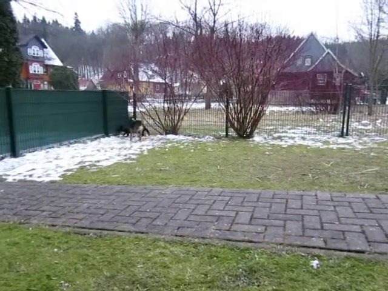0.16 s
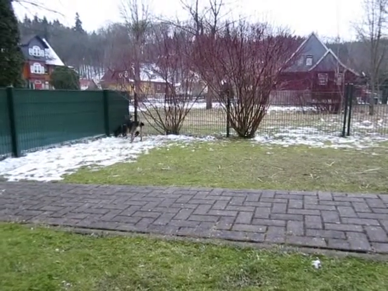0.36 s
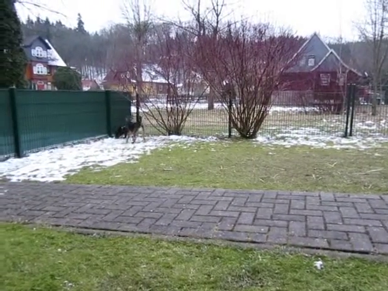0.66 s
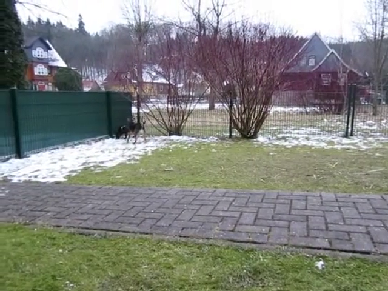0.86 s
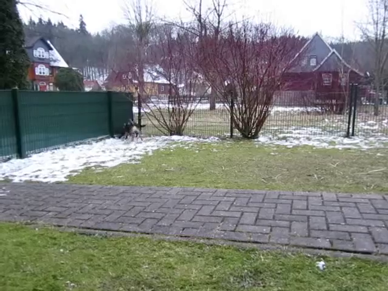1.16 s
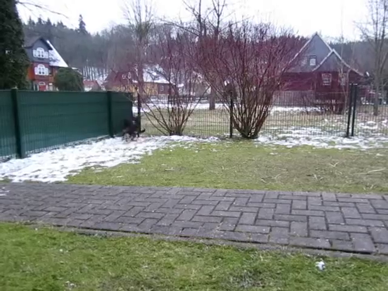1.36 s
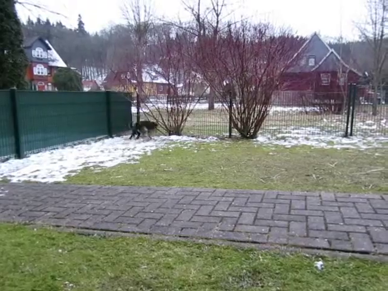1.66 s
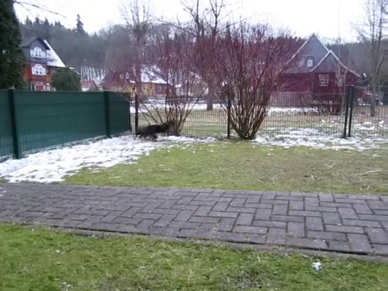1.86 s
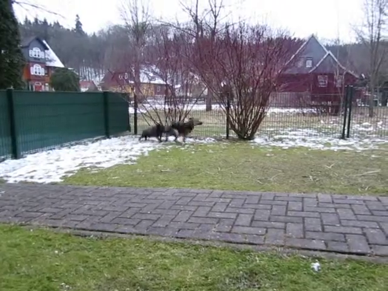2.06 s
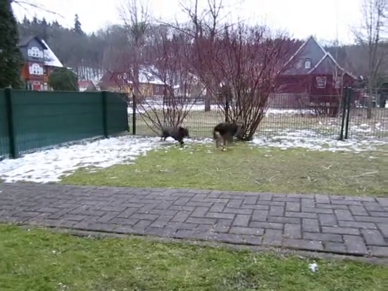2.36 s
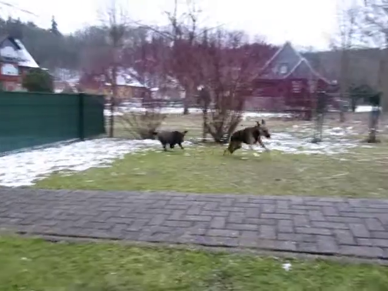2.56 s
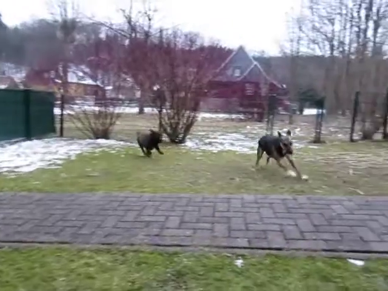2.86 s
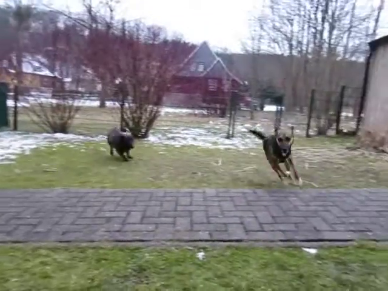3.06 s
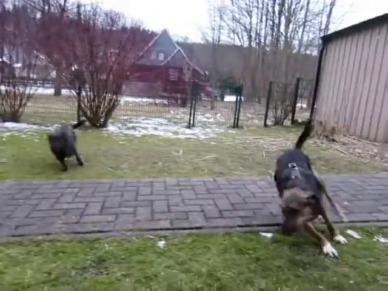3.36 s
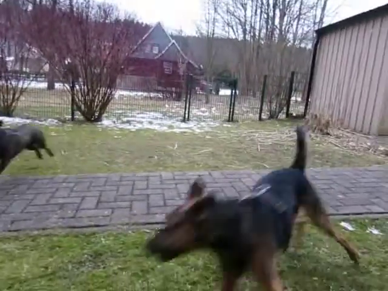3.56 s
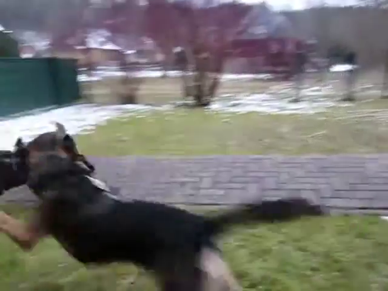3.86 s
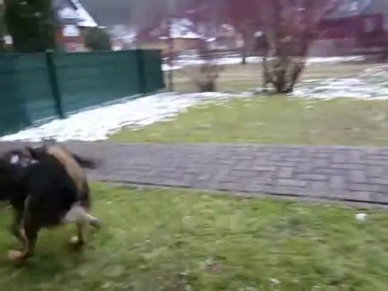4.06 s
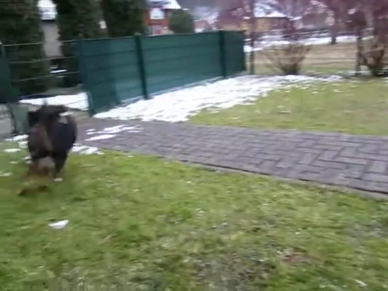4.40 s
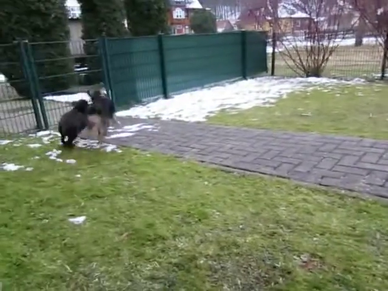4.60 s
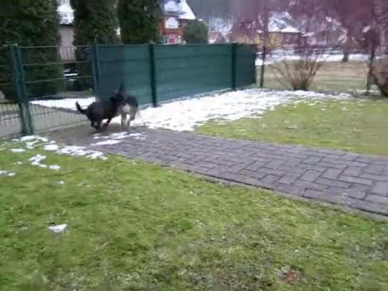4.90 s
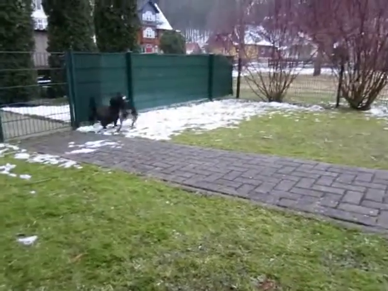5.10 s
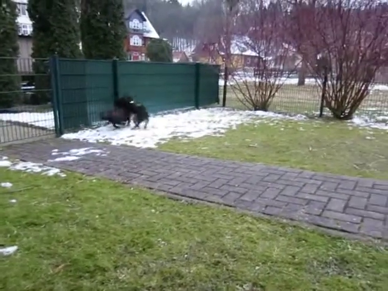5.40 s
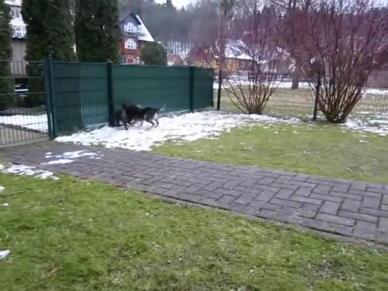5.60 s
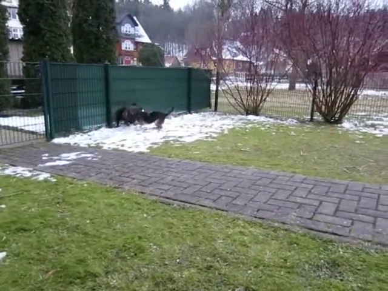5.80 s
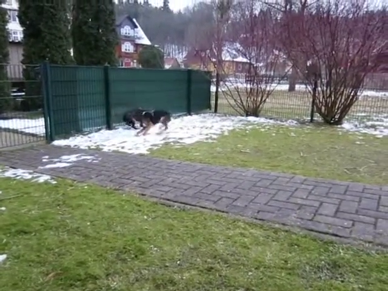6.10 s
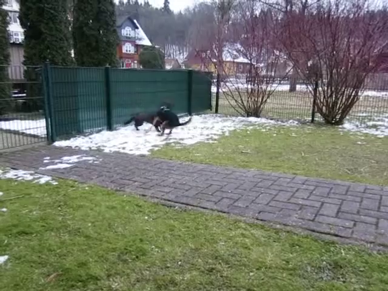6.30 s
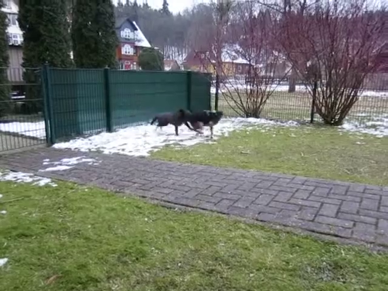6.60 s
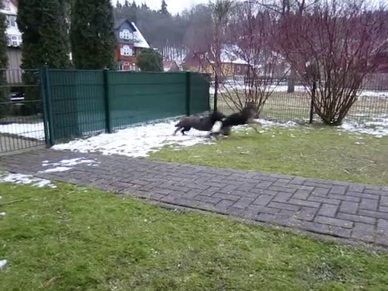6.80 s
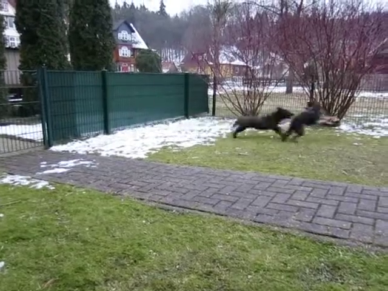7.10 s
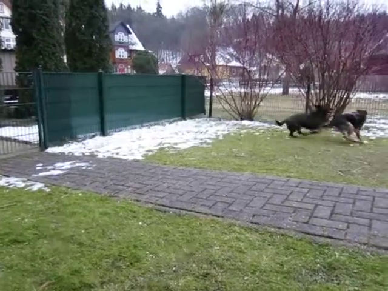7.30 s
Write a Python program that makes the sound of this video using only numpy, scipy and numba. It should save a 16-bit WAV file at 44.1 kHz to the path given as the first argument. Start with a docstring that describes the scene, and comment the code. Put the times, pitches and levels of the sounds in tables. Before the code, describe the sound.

A soft, low outdoor hush runs throughout, with thin bird chirps now and then, most clustered around 2.3-2.5 seconds. At 0.3 a collar tag ticks twice over light rustling and soft paw thuds. From 1.3 to 2.0 a dog growls, throaty and wavering, partly clear in tone. Around 2 the tag jingles and paws break into a run, crunching grass and snow; claws scrape grittily at 2.8, 3.1 and 3.5. A very loud, dry knock hits the microphone at 3.4. Close crunching, skidding and a bright tag jingle pass at 3.7-4.0. A short bark comes at 4.1, a rasping snarl at 4.4-4.7, with sharp snaps and crackling. A rough, pulsing wrestling growl fills 5.1-6.0, ending with a faint thin whistle. Short gruff barks follow at 6.2, 6.6, 7.0 and 7.3, amid rustling and slight garden echo.

```python
"""Dogs play-fight in a winter garden: rough pulses of voice ring chest, throat, mouth and teeth as growls and barks.
A metal collar tag jingles as a set of struck tones; paws thud as damped bursts of noise.
Grass and snow crackle as many tiny random fractures, claws scrape grittily, and the camera is knocked once.
Small birds chirp as bending whistles over a distant hush of filtered noise; a fence, shed and bushes echo."""
import sys
import numpy as np
from scipy import signal
from scipy.fft import rfft, irfft, next_fast_len
from scipy.io import wavfile
from scipy.ndimage import uniform_filter1d
from numba import njit

SR = 44100
rng = np.random.default_rng(int(sys.argv[2]) if len(sys.argv) > 2 else 0)


def wrap_up_sound(samples):
    """Save the sound to the file named by the first command line argument, as 16-bit audio."""
    columns = np.atleast_2d(samples).T
    # keep every value between -1 and 1, then stretch to whole-number steps
    tamed = np.clip(columns, -1, 1)
    steps = np.round(tamed * 32767).astype(np.int16)
    wavfile.write(sys.argv[1], SR, steps)


N = 328525
T = np.arange(N) / SR  # time of every sample in seconds

# How much grass and snow rustle under the dogs. Each row: time in seconds, relative level in dB.
SCUFFLE = [(.35, -57.5), (.7, -88), (1.3, -64.5), (1.95, -54.5), (3.6, -55.5), (4.8, -50.5), (5.3, -51),
           (6.1, -56.5), (6.85, -49), (7.2, -64)]


def undb(db):
    """Turn decibels into a gain."""
    return 10 ** (np.asarray(db) / 20)


def unit(x):
    """Scale to an average (rms) strength of 1."""
    return x / np.sqrt(np.mean(x ** 2) + 1e-18)


def steady(x, size=1300):
    """Even out the short-time strength to about 1 while keeping the single pulses."""
    power = uniform_filter1d(uniform_filter1d(x ** 2, size), size // 2)
    return x / np.sqrt(power + 1e-14)


def add(track, s, x):
    """Mix x into the track from time s in seconds."""
    i = int(np.clip(s * SR, 0, N - 1))
    track[i:i + len(x)] += x[:N - i]


def wander(count, hz):
    """Random values joined by straight lines, with hz new values a second."""
    return np.interp(np.arange(count) * hz / SR, np.arange(1024), rng.standard_normal(1024))


def follow(t, rows):
    """Read every column of a curve at the times t; the first column is time."""
    s, *columns = np.transpose(rows)
    return [np.interp(t, s, column) for column in columns]


def spectral(x, response):
    """Filter by a response given as a function of frequency."""
    n = next_fast_len(x.shape[-1] + 2048)
    hz = np.arange(n // 2 + 1) * SR / n + 1e-3
    return irfft(rfft(x, n) * response(hz), n)[..., :x.shape[-1]]


def colour(x, points):
    """Filter along a curve of points, each a frequency in Hz and a gain in dB."""
    hz, db = np.transpose(points)
    return spectral(x, lambda f: undb(np.interp(np.log(f), np.log(hz), db)))


@njit
def svf(x, hz, width):
    """Band-pass whose centre may move at every sample, like a changing hollow space."""
    y, b, l = np.empty(len(x)), 0., 0.  # output, band-pass state, low-pass state
    for i in range(len(x)):
        g, k = np.tan(np.pi * hz[i] / SR), width / hz[i]
        v = (b + g * (x[i] - l)) / (1 + g * (g + k))
        b, l, y[i] = 2 * v - b, l + 2 * g * v, k * v
    return y


def resonate(x, hz, width_hz):
    """A steep resonance: the band-pass applied twice."""
    centre = hz + np.zeros(len(x))
    once = svf(x, centre, float(width_hz))
    return svf(once, centre, float(width_hz))


def cavity(x, modes):
    """A hollow body: side-by-side resonances, added with alternating sign."""
    out = 0
    for k, (hz, width, db) in enumerate(modes):
        out = out + (-1) ** k * undb(db) * resonate(x, hz, width)
    return out


def ring(modes, length=.2):
    """A struck solid: each mode is a tone that falls by 60 dB in its time t60."""
    t = T[:int(length * SR)]
    return sum(undb(db - 60 * t / t60) * np.sin(2 * np.pi * hz * t) for hz, db, t60 in modes)


def ports(x):
    """Two microphone openings hear the treble out of step: equal strength, shifted phase."""
    # Each row: frequency in Hz, angle in radians by which the left leads the right.
    lead_points = [(120, 0), (400, .2), (900, .58), (2500, -.13), (8000, 1.46), (10000, 1.28), (13400, 3.4)]
    half_lead = lambda f: np.interp(f, *np.transpose(lead_points)) / 2
    return np.array([spectral(x, lambda f: np.exp(1j * side * half_lead(f))) for side in (1, -1)])


def stereo(mid, side, wide_hz=55):
    """Sound from all around: long waves reach both sides alike, short ones differ."""
    return mid + spectral(side, lambda f: 0.74 * f / (f + wide_hz)) * np.array([[1], [-1]])


def garden(x, wet_db, t60):
    """Direct sound plus scattered echoes from fence, shed and bushes, fading by 60 dB in t60 seconds."""
    t = T[:SR // 2]
    fade = undb(-60 * t / t60) * (1 - np.exp(-t / 0.00041))
    tail = stereo(*rng.standard_normal((2, len(t)))) * fade
    tail /= np.sqrt(np.sum(tail ** 2, axis=1, keepdims=True))
    echoes = signal.fftconvolve(x[None], tail, axes=1)[:, :N]
    return ports(x) + undb(wet_db) * echoes


def strays(count, db):
    """Faint events at random moments, louder where the dogs rustle more: rows of seconds and dB."""
    spread_db = 5
    chance = rng.random((count, 2))
    s = (np.arange(count) + chance[:, 0]) / count * T[-1]
    levels_db = np.interp(s, *np.transpose(SCUFFLE)) + db - spread_db * chance[:, 1]
    return list(zip(s, levels_db))


def hush(level_db=-42.5, waver_db=0.76):
    """Distant outdoor air: deep-coloured noise, gently wavering, with the bass alike on both sides."""
    # Tone colour of the air. Each row: frequency in Hz, relative level in dB.
    air_colour = [(15, -47), (25, -10), (60, 1), (131, -4.5), (243, -9.5), (952, -11.5), (2700, -21),
                  (3930, -23.5), (6200, -27), (15000, -35)]
    mid, side = colour(rng.standard_normal((2, N)), air_colour)
    chance = np.interp(T, np.linspace(0, T[-1], num=50), rng.standard_normal(50))
    return stereo(mid, side) / np.std(mid) * undb(level_db) * undb(waver_db * chance)


def grains(rate, spread_db, grain_s=0.0017):
    """Strength of many tiny fractures, rate a second: unequal random hits that each die away quickly."""
    size = undb(spread_db * np.minimum(rng.exponential(size=N), 4.5))
    hits = (rng.random(N) < rate / SR) * size ** 2
    energy = signal.lfilter([1], [1, -np.exp(-1 / (grain_s * SR))], hits)
    return unit(np.sqrt(energy))


def crackling(envelope, points):
    """Noise of tiny fractures, partly direct and partly scattered, in the colour of the material."""
    direct, mid, side = rng.standard_normal((3, N))
    return colour(envelope * (0.82 * ports(direct) + 0.74 * stereo(mid, side)), points)


def scuffle():
    """Grass and snow crackle under the dogs, with bursts where paws break through and lone snaps."""
    # Paws breaking the frosty crust. Each row: start in seconds, relative level in dB, decay in seconds.
    crunches = [(1.909, -33, 0.016), (2.368, -28, 0.017), (2.675, -27.5, .007), (3.7035, -25.5, .01),
                (3.732, -21, 0.011), (3.8748, -22, 0.0054), (4.01, -28.5, 0.021), (4.35, -25.5, 0.016),
                (4.669, -29, 0.0062), (4.8, -22, .015), (4.8556, -23.5, 0.02), (5.762, -21.5, 0.027)]
    # Sharp snaps of ice and twigs. Each row: start in seconds, relative level in dB.
    snap_rows = [(3.0875, -22), (3.8485, -21), (3.9231, -20), (4.683, -16.5)]
    # The dogs skid and scrabble. Each row: start in seconds, length in seconds, relative level in dB.
    skids = [(3.689, 0.31, -45), (5.073, 0.15, -47), (5.718, 0.18, -44.5)]
    # Colours of the rustle and of the crust. Each row: frequency in Hz, gain in dB.
    rustle_colour = [(300, 9.5), (900, 10.5), (1600, 1), (3000, 8), (6000, 5), (9000, 6.5), (12500, 11),
                     (14500, 6), (16000, -11)]
    crust_colour = [(300, -2), (1600, -2), (3000, 5.5), (6000, 5.5), (9000, 5), (12500, 12.5), (14500, 6),
                    (16000, -10)]
    stray_s, snap_s, skid_edge_s = 0.006, 0.00062, 0.032  # decays; rise and fall of a skid
    rustle_db, patchy_db, crunch_db, snap_db = 2, 4.0, -11, -7

    bursts, snaps = np.zeros((2, N))
    t = T[:SR // 10]
    stray_crunches = [(s, db, stray_s) for s, db in strays(count=16, db=13)]
    for s, db, decay_s in crunches + stray_crunches:
        add(bursts, s, undb(db + crunch_db) * np.exp(-t / decay_s))
    for s, db in snap_rows:
        add(snaps, s, undb(db + snap_db) * np.exp(-t / snap_s))

    rustle = undb(np.interp(T, *np.transpose(SCUFFLE)))
    for s, length, db in skids:
        edges = np.clip(np.minimum(T - s, s + length - T) / skid_edge_s, 0, 1)
        rustle = np.maximum(rustle, undb(db) * edges)
    # many light steps make the rustle come in patches
    rustle *= undb(patchy_db * wander(N, hz=54.1))

    crackle = undb(rustle_db) * rustle * grains(rate=1200, spread_db=1.5, grain_s=0.002)
    crunch = bursts * grains(rate=3100, spread_db=3.0, grain_s=0.00049) + snaps
    return crackling(crackle, rustle_colour) + crackling(crunch, crust_colour)


def collar():
    """The tag ticks on its ring, rings in several tones and rebounds; each blow loads it differently."""
    # Tag strikes. Each row: start in seconds, relative level in dB,
    # extra level of the top mode in dB, shift of all modes in Hz.
    jingles = [(0.317, -33, -6, 9), (0.3615, -32.5, 1, -42), (2.0358, -26.5, -5, 27), (2.557, -34.5, -3, 0),
               (3.3002, -25.5, -6, 21), (3.7913, -12.5, 2, 25), (4.213, -28.5, -8, -47),
               (5.109, -34, 11, -62), (5.419, -29, 7.5, -110), (5.6, -30.5, -15, -88)]
    # Modes of the tag before that shift. Each row: frequency in Hz, relative level in dB,
    # time to fall by 60 dB in seconds.
    tag = [(5870, -9, 0.033), (7000, -21, 0.055), (9895, 4.5, 0.1), (9980, -4.5, 0.12), (13340, 4.5, 0.052)]
    tag_db, tick_db, tick_s = -3, -7, 0.00063
    rebound_s, rebound_db = 0.016, -19  # the tag falls back on its ring
    out = np.zeros(N)
    top_hz = tag[-1][0]
    for s, db, upper_db, shift_hz in jingles:
        modes = [(hz + shift_hz, mode_db + upper_db * (hz == top_hz), t60) for hz, mode_db, t60 in tag]
        tone = ring(modes)
        bright_noise = np.diff(rng.standard_normal(len(tone) + 1)) / 2
        tick = undb(tick_db) * bright_noise * np.exp(-T[:len(tone)] / tick_s)
        strike = undb(db + tag_db) * (tone + tick)
        add(out, s, strike)
        add(out, s + rebound_s, undb(rebound_db) * strike)
    return garden(out, wet_db=-6.5, t60=0.06)


def footfalls(events, hz, width_hz, decay_s, gain_db):
    """Short shoves into damped ground: dying noise through one broad resonance."""
    out, t = np.zeros(N), T[:SR // 6]
    for s, db in events:
        shove = rng.standard_normal(len(t)) * np.exp(-t / decay_s)
        thud = resonate(shove, hz, width_hz)
        # start a little early, as the resonance takes time to build up
        add(out, s - 1 / width_hz / 2, undb(db + gain_db) * thud / np.abs(thud).max())
    return garden(out, wet_db=-5, t60=.1)


def thuds():
    """Paws land on the lawn: a low, soft resonance."""
    # Each row: time in seconds, relative peak level in dB.
    landings = [(0.353, -31.5), (0.491, -37.5), (2.074, -31.5), (2.459, -37.5), (4.123, -33.5),
                (4.225, -38.5)]
    return footfalls(landings + strays(count=8, db=11.5), hz=77.0, width_hz=112.0, decay_s=0.035, gain_db=7.0)


def pats():
    """Lighter pats and knocks of the feet: a higher, broader and shorter resonance."""
    # Each row: time in seconds, relative peak level in dB.
    touches = [(0.45, -34.5), (2.044, -37.5), (2.877, -29.5), (3.478, -35.5)]
    return footfalls(touches + strays(count=8, db=26), hz=800, width_hz=2070, decay_s=0.013, gain_db=3.5)


def birds(waver=0.03, waver_hz=200):
    """Each chirp is a thin, slightly unsteady whistle bending through three pitches; the trees answer."""
    # Arches and falling slurs. Each row: start in seconds, length in seconds, start pitch in Hz,
    # middle pitch in Hz, end pitch in Hz, level in dB.
    chirps = [(0.891, 0.064, 3600, 4810, 3650, -47.5), (1.545, 0.064, 4740, 4500, 4210, -49),
              (2.296, .055, 3900, 3660, 3210, -41.5), (2.4, 0.082, 3450, 4640, 3230, -40.5),
              (2.482, 0.044, 3450, 4000, 3120, -36.5), (2.532, 0.016, 3800, 3850, 3750, -39),
              (3.343, .085, 3900, 4780, 4450, -48), (3.439, 0.061, 3450, 4090, 3630, -43.5),
              (4.534, 0.043, 4200, 4760, 4430, -41), (5.447, 0.044, 3820, 5170, 3900, -41),
              (5.565, 0.046, 3940, 4460, 4383, -41), (6.77, 0.067, 4300, 4650, 4620, -40),
              (6.858, 0.073, 3750, 4050, 3920, -47)]
    out = np.zeros(N)
    for s, length, start_hz, middle_hz, end_hz, db in chirps:
        t = np.arange(0, length, 1 / SR)
        arch = np.abs(np.sin(np.pi * t / length))
        line_hz = start_hz + (end_hz - start_hz) * t / length
        hz = line_hz + (middle_hz - (start_hz + end_hz) / 2) * arch
        hz *= 1 + waver * wander(len(t), waver_hz)
        add(out, s, undb(db) * arch ** 0.18 * np.sin(2 * np.pi * np.cumsum(hz) / SR))
    return garden(out, wet_db=2, t60=0.42)


def larynx(hz, rough, jitter=.3, shimmer_db=5, weak_beat=0.7):
    """Pulses of the vocal folds; roughness shakes their timing and size and weakens every other one."""
    cycles = np.cumsum(hz) / SR
    k = np.arange(int(cycles[-1]) + 1)
    chance = rng.standard_normal((256, 2))[k]
    r = np.interp(k, cycles, rough)  # roughness at each pulse
    at = np.interp(k + jitter * r * chance[:, 0], cycles, np.arange(len(hz))).astype(int)
    pulses = np.zeros(len(hz))
    pulses[at] = undb(shimmer_db * r * chance[:, 1]) * (1 - weak_beat * r * (k % 2))
    return pulses


def growl(t, chest_db, mouth_db, snarl_db, rumble_db, hz, rough, throat_hz, mouth_hz, muzzle_hz):
    """One call: pulses and puffs of turbulent breath ring chest, throat, mouth and teeth."""
    # Resonances of chest, open mouth and bared teeth.
    # Each row: frequency in Hz, width in Hz, relative level in dB.
    chest_modes = [(152.6, 50, -18), (250, 128, -13.5)]
    mouth_modes = [(560, 78, -2.5), (1148, 170, -17)]
    teeth_modes = [(1820, 400, -3), (2890, 220, -5), (3420, 2000, -8.5)]
    throat_width_hz, mouth_width_hz, muzzle_width_hz = 115, 240, 680
    rumble_ratio, rumble_width_hz = 0.9, 115  # rumble centre as a share of the pulse rate
    lip_ratio, lip_width_hz = 0.63, 900  # lip centre as a share of the mouth resonance
    chest_air, mouth_air, snarl_air = 1.4, 2.4, 3.8  # breath noise per pulse strength at full roughness
    groan_db, groan_ends_at = 6, .7  # clean tone; roughness at which it is gone
    groan_wobble = .13  # size of the pitch waver at full roughness
    flap_hz, flap_db = 70.6, 2.5  # middle rate and level swing of the flapping
    puff_s, fade_s, gain_db, teeth_db = .009, 0.0067, -1.0, -2  # puff_s: decay of breath after a pulse

    rough = np.clip(rough, 0, 1)
    waver = 1 + groan_wobble * rough * wander(len(t), hz=70.05)
    pulses = larynx(hz * waver, rough)
    breath = signal.lfilter([1], [1, -np.exp(-1 / (puff_s * SR))], pulses)
    puffs = breath * rng.standard_normal(SR * 2)[:len(t)]
    low, middle, high = (unit(pulses) + air * rough * unit(puffs)
                         for air in (chest_air, mouth_air, snarl_air))
    # slack lips and palate flap at an unsteady rate and chop the breath into a rasp
    flap_rate = flap_hz * 2 ** (wander(len(t), flap_hz) / 2)
    flap = undb(flap_db * np.sin(2 * np.pi * np.cumsum(flap_rate) / SR))

    # a clean groan sings on the throat resonance
    groan = np.cos(2 * np.pi * np.cumsum(throat_hz * waver) / SR)
    throat = resonate(low, throat_hz, throat_width_hz)
    chest = steady(throat + (0.72 + 2.77 * rough) * cavity(low, chest_modes))
    chest = steady(chest + undb(groan_db) * np.maximum(1 - rough / groan_ends_at, 0) * groan)
    # the chest rumbles near the pulse rate
    rumble = steady(resonate(low, rumble_ratio * hz, rumble_width_hz)) * undb(rumble_db)

    mouth = resonate(middle * flap, mouth_hz, mouth_width_hz) + cavity(middle * flap, mouth_modes)
    # the lips pass only a broad band round the mouth resonance
    mouth = steady(resonate(mouth, mouth_hz * lip_ratio, lip_width_hz)) * undb(mouth_db)
    snarl = resonate(high * flap, muzzle_hz, muzzle_width_hz) + cavity(high * flap, teeth_modes)
    snarl = steady(snarl) * undb(snarl_db + teeth_db)
    fade = np.clip(np.minimum(t - t[0], t[-1] - t) / fade_s, 0, 1)
    return (chest + rumble + mouth + snarl) * undb(chest_db + gain_db) * fade


def long_growl(levels, shape, order, muzzle_hz, gain_db):
    """A drawn-out growl: the throat resonance rides on one harmonic (order) of the pulse rate."""
    t = np.arange(levels[0][0], levels[-1][0], 1 / SR)
    chest_db, mouth_db, snarl_db, rumble_db = follow(t, levels)
    rough, throat_hz, mouth_hz = follow(t, shape)
    out = np.zeros(N)
    add(out, t[0], growl(t, chest_db + gain_db, mouth_db, snarl_db, rumble_db, throat_hz / order,
                         rough, throat_hz, mouth_hz, muzzle_hz))
    return out


def bark(s, attack, hold, release, db, sag_db, mouth_db, yap_db, first_snarl_db, last_snarl_db, rumble_db,
         pitch_hz, throat_hz, mouth_hz, glide, muzzle_hz, rough):
    """Effort swells, changes and dies; pitch and throat follow it while the jaw opens or closes."""
    rise_db, fall_db = 17, 16.5  # swell over the attack, drop over the release
    yap_s = 0.01  # the mouth flies open for about this long either side of the end of the attack
    jaw_db_per_octave = 11  # a wider jaw lets more out
    pitch_octaves_per_db = 0.01  # pitch and throat resonance rise with effort
    knees = np.cumsum([0, attack, hold, release])
    t = np.arange(0, knees[-1], 1 / SR)
    effort_db = np.interp(t, knees, [-rise_db, 0, -sag_db, -sag_db - fall_db])
    jaw = glide * (np.minimum(t, attack + hold) - attack)  # opening in octaves
    yap = yap_db * np.exp(-((t - attack) / yap_s) ** 2)
    tension = 2 ** (pitch_octaves_per_db * effort_db)
    return growl(s + t, db + effort_db, mouth_db + yap + jaw_db_per_octave * jaw,
                 np.linspace(first_snarl_db, last_snarl_db, len(t)), rumble_db,
                 pitch_hz * tension, np.full(len(t), rough), throat_hz * tension, mouth_hz * 2 ** jaw, muzzle_hz)


def dogs():
    """All growls and barks: long calls follow drawn curves, short barks follow a swell of effort."""
    # Levels of the long growls. Each row: time in seconds, relative chest level in dB,
    # then open mouth, snarl and rumble in dB relative to the chest.
    warning_levels = [(1.325,-40,-14,-22,-10), (1.345,-30.5,-23,-32,-21), (1.378,-23,-9,-30,-19),
                      (1.46,-30.5,-14.5,-21,-5), (1.573,-37.5,-12,-18,-6), (1.659,-27,-15.5,-32,-12.5),
                      (1.713,-29.5,-6.5,-28,-9.5), (1.855,-32.5,-10.5,-24,-11), (1.98,-40.5,-8,-9,-9)]
    lunge_levels = [(4.432,-37,0,2,-5), (4.452,-32.5,-1,-11,-9), (4.468,-21.5,-3.5,-20.5,-11),
                    (4.51,-28.5,1,-9.5,2), (4.536,-31.5,-0.5,-7,2), (4.586,-31.5,4.5,-0.5,1),
                    (4.615,-31.5,2.5,-2.5,0), (4.69,-49,-6,1,9)]
    wrestling_levels = [(5.12,-47,-20,-20,-4), (5.148,-28,-19,-15,-15), (5.205,-35,-3,-10,-8),
                        (5.24,-34,5,-17,3), (5.315,-41,-3,-9,3.5), (5.47,-40,8.5,4.5,8.5),
                        (5.585,-29.5,-4.5,-11.5,-6), (5.62,-38,1.5,-2,0), (5.68,-30.5,1.5,-3.5,-4.5),
                        (5.775,-29,4,-15,-8), (5.857,-35.5,-3,-6,1), (5.886,-26,-9,-18,-18),
                        (5.99,-42,-11,-14,-5)]
    # Their shapes, as the voice roughens and clears and the jaw moves. Each row: time in seconds,
    # roughness from 0 to 1, throat resonance in Hz, mouth resonance in Hz.
    warning_shape = [(1.33,0.25,254.2,800), (1.375,0.52,406.7,820), (1.46,0.61,405.4,800),
                     (1.58,.7,319.8,620), (1.655,0.22,397.6,750), (1.7,0.53,403,800), (1.77,0.44,337,718),
                     (1.86,0.4,298.6,634), (1.95,0.64,215.2,720)]
    lunge_shape = [(4.44,0.54,283.2,700), (4.471,0.36,322,754), (4.525,0.59,289.6,1020),
                   (4.58,0.92,265,1150), (4.615,.65,286.5,1180), (4.68,0.83,250,800)]
    wrestling_shape = [(5.12,0.23,233.3,900), (5.15,0.15,281.2,900), (5.251,.65,250,926),
                       (5.45,0.73,235.5,880), (5.58,0.36,294.6,1100), (5.68,0.73,274.8,686),
                       (5.745,.45,299.6,664), (5.85,0.668,256,680), (5.88,0.097,274,620),
                       (5.96,.15,211.4,590)]
    # Short barks. Each row: start, attack, hold and release in seconds, relative chest level in dB,
    # sag over the hold in dB, open mouth in dB relative to the chest, yap in dB,
    # snarl at the start and at the end and rumble in dB relative to the chest,
    # then at the end of the attack: pitch in Hz, throat resonance in Hz, mouth resonance in Hz;
    # mouth glide in octaves a second, muzzle resonance in Hz, roughness from 0 to 1.
    barks = [(4.123, 0.036, 0.011, 0.075, -30, 3.5, -5, 6.5, -0.5, -5, -4, 134, 277.4, 1250, 1, 2390, 0.46),
             (6.173, 0.032, 0.052, 0.05, -31, -2.5, -6.5, 7, -15, -6.5, -4.5, 120.5, 270, 560, -1, 2500, 0.58),
             (6.59, 0.037, 0.077, 0.042, -25, 4, -2, 6, -4.5, -38, -9, 135.4, 303.6, 800, -5.5, 1910, 0.56),
             (7.01, 0.0246, 0.024, .06, -28.5, 1, -7.5, 3, -16, -6, -5.5, 124.7, 260.4, 694, 2.5, 2500, 0.537),
             (7.338, 0.032, 0.049, 0.035, -23.5, -2.5, -4.5, 1, -39, -6, -22, 133.4, 302, 687, -0.6, 2870, 0.68)]
    out = long_growl(warning_levels, warning_shape, order=3, muzzle_hz=2290, gain_db=2.75)
    # the lunge is a bark drawn out into a snarl
    out += long_growl(lunge_levels, lunge_shape, order=2, muzzle_hz=2200, gain_db=1.7)
    out += long_growl(wrestling_levels, wrestling_shape, order=2, muzzle_hz=1840, gain_db=0.5)
    for row in barks:
        add(out, row[0], bark(*row))
    return garden(out, wet_db=-8.5, t60=0.22)


def scrapes(hz=2700, width_hz=1100):
    """Claws drag over hard ground: grainy noise in one gritty band."""
    # Each row: start in seconds, length in seconds, relative level in dB.
    drags = [(2.757, 0.07, -46), (3.057, 0.059, -42), (3.457, 0.088, -44)]
    out = np.zeros(N)
    for s, length, db in drags:
        t = np.arange(0, length, 1 / SR)
        add(out, s, undb(db) * np.sin(np.pi * t / length))
    grit = unit(resonate(rng.standard_normal(N) * grains(rate=820, spread_db=4.0), hz, width_hz))
    return garden(out * grit, wet_db=-5.5, t60=0.074)


def clack(start_s=3.3865, level_db=10.5, crack_db=-12, crack_s=0.00051, right_db=-10):
    """One hard knock on the camera housing; it shakes the two sides in opposite directions."""
    # Modes of the housing. Each row: frequency in Hz, relative level in dB, time to fall by 60 dB in seconds.
    housing = [(360,-19,0.031), (880,-7,0.013), (2440,-13,0.011), (2770,-6,0.0084), (3490,-9.5,0.0097),
               (4360,-11.5,0.0066), (8680,-12,0.0074)]
    out = np.zeros(N)
    body = ring(housing)
    crack = undb(crack_db) * rng.standard_normal(len(body)) * np.exp(-T[:len(body)] / crack_s)
    add(out, start_s, undb(level_db) * (body + crack))
    return np.array([out, -undb(right_db) * out])


def whistle(start_s=5.79, length_s=0.27, hz=3330, width_hz=320, level_db=-50):
    """A thin, unsteady whistle as the wrestling growl dies: noise through a narrow resonance."""
    out, t = np.zeros(N), T[:int(length_s * SR)]
    tone = steady(resonate(rng.standard_normal(SR)[:len(t)], hz, width_hz))
    swell = np.sqrt(np.abs(np.sin(np.pi * t / length_s)))
    add(out, start_s, undb(level_db) * tone * swell)
    return out


def scene():
    """Dogs, their feet and collar, and the garden round them."""
    ground = scuffle() + thuds() + pats() + scrapes()
    return hush() + ground + collar() + birds() + dogs() + clack() + whistle()


def record(dry, top_hz=16000):
    """Peaks beyond full scale are flattened, then a steep low-pass cuts the top."""
    low_pass = signal.ellip(8, .2, 70, top_hz, fs=SR, output="sos")
    return signal.sosfilt(low_pass, np.clip(dry, -1, 1))


dry = scene()
out = record(dry)
wrap_up_sound(out)
```